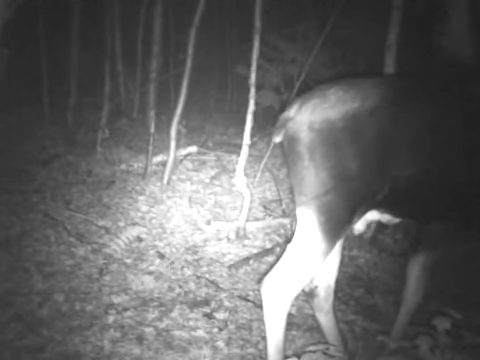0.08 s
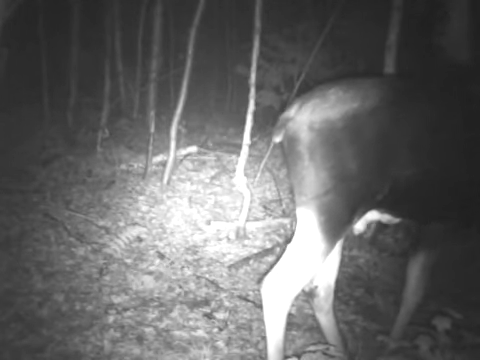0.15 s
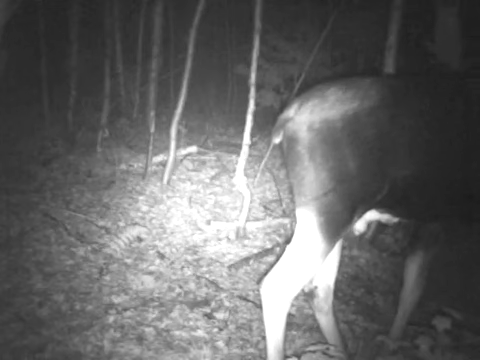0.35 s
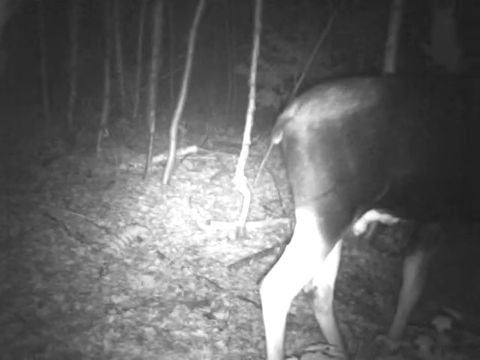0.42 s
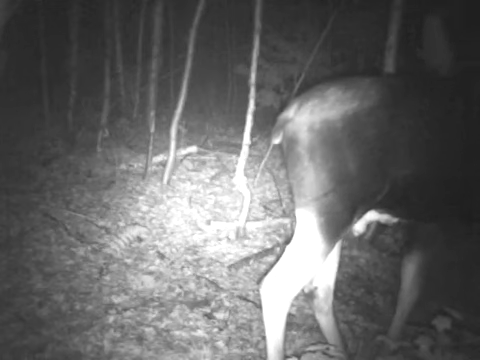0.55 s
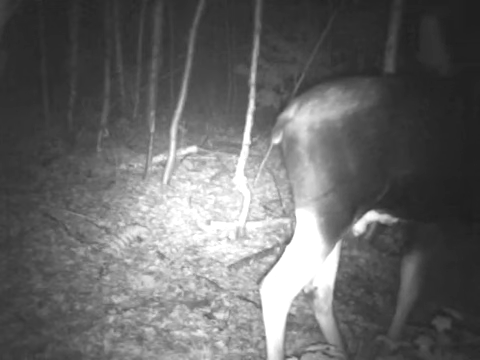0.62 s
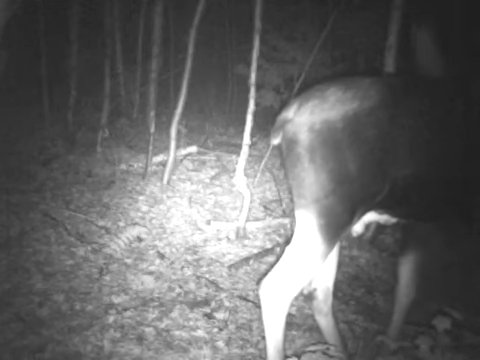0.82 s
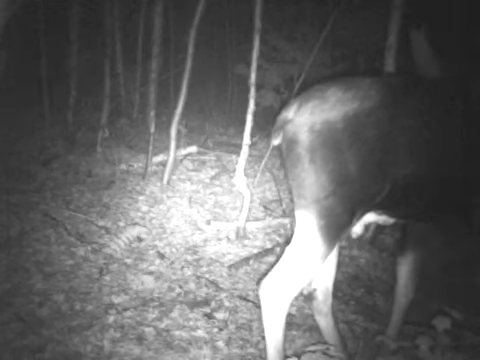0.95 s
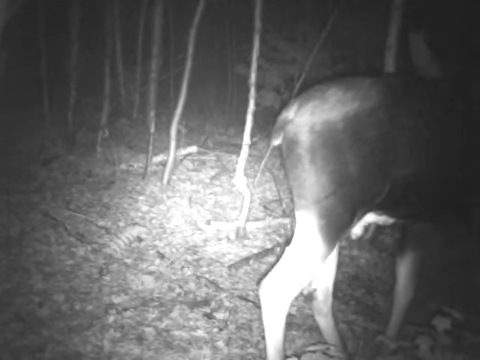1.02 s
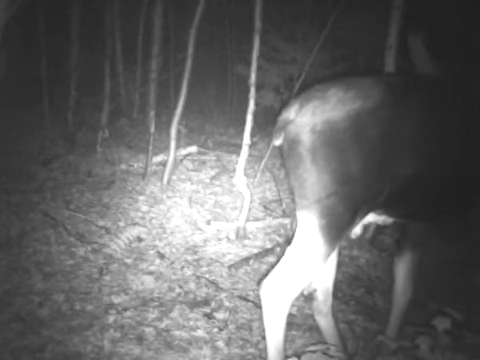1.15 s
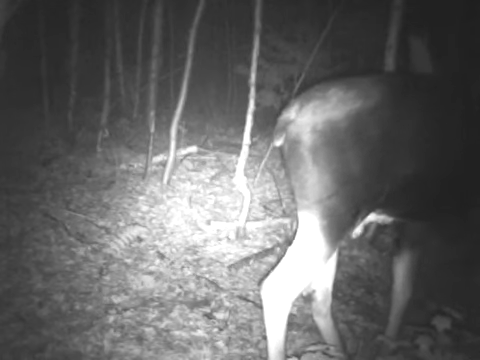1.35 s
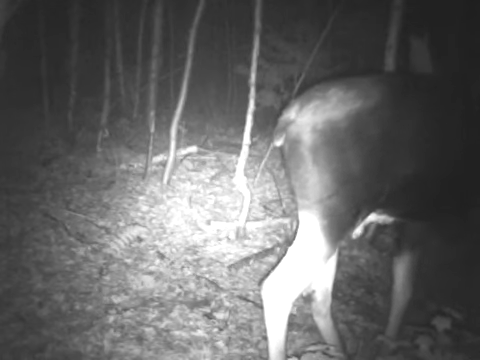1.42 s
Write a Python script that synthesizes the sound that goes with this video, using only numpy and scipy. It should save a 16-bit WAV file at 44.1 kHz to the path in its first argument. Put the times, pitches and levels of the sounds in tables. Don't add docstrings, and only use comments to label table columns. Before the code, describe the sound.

A cow moose gives one short nasal moan that bursts into a loud bellow and breaks wetly.

```python
import sys
import numpy as np
from scipy import signal
from scipy.fft import rfft, irfft
from scipy.io import wavfile
from scipy.ndimage import uniform_filter1d

SR = 44100
rng = np.random.default_rng(int(sys.argv[2]) if len(sys.argv) > 2 else 0)


def log_audio(samples):
    frames = np.atleast_2d(samples).T
    limited = np.clip(frames, -1, 1)
    pcm = np.round(limited * 32767).astype(np.int16)
    wavfile.write(sys.argv[1], SR, pcm)


def voltage_ratio(level):
    return 10 ** (np.asarray(level, float) / 20)


N = 66150


def evened(x):
    return x / np.sqrt(np.mean(x ** 2) + 1e-20)


def read(points, hz):
    f, value = np.transpose(points)
    return np.interp(np.log(hz + 1), np.log(f + 1), value)


def coloured(points):
    gain = voltage_ratio(read(points, np.fft.rfftfreq(N, 1 / SR)))
    return evened(irfft(rfft(rng.standard_normal(N)) * gain, N))


def slow(rate_hz):
    return evened(signal.lfilter(*signal.butter(2, rate_hz, fs=SR), rng.standard_normal(N)))


def swells(rows):
    t = np.arange(N) / SR
    return sum(voltage_ratio(db) * np.exp(-((t - centre_s) / half_s) ** 2) for centre_s, half_s, db in rows)


def ring(rows):
    out, t = np.zeros(N), np.arange(6000) / SR
    for start_s, hz, db, t60_s in rows:
        onset = 1 - np.exp(-t / (0.067 * t60_s))
        tone = np.sin(2 * np.pi * hz * t * (1 - 1.6 * t))
        out[round(start_s * SR):][:len(t)] += 2 * voltage_ratio(db - 60 * t / t60_s) * onset * tone
    return out


def peak(f, hz, width_hz):
    return 1j * f * width_hz / (hz ** 2 - f ** 2 + 1j * f * width_hz)


# time_s, low_hz, low_db, main_hz, chest_db, nose_db
THROAT_SHUT = [(.035, 764, 13, 1073, 58, -22.5), (.06, 983, 9, 1400, 9, 7), (.09, 661, 9, 1440, -1, -4),
               (.135, 833, 5.5, 1200, -7.5, -1.5), (.2, 918, -8.5, 1214, -10, -12),
               (.26, 932, -2, 1236, -15, -5.5), (.31, 590, -3, 1254, -9.5, -7.5),
               (.345, 662, -6, 989.3, -18.5, -10.5), (0.372, 647, 0, 985, -13, 1.5)]
THROAT_OPEN = [(.381, 870, -21, 1236, -22.5, -27), (0.395, 820, -4.5, 1172, -15.5, -48),
               (0.421, 820, -8.5, 1184, -22.5, -9.5), (0.435, 1000, -6, 1310, -16, -32),
               (0.469, 1095, -10, 1296, -25, -47), (0.489, 1010, -7.5, 1260, -24.5, -55),
               (.51, 990, -3, 1289, -27, -2), (0.536, 881, -4, 1300, -1, -23)]
# centre_hz, width_hz, level_db
NOSE = [(1754, 93, -3.5), (2262, 98, -16.5), (2500, 250, -18.5)]
LOW_WIDTH_HZ, MAIN_WIDTH_HZ, TOP_HZ = 105, 96.3, 2600
CHEST_HZ, CHEST_WIDTH_HZ = 337, 220
SINUS_HZ, SINUS_WIDTH_HZ, SINUS_DB = 589, 129, -6
RING_SHARE = .6


def throat(f, t):
    shape = np.transpose(THROAT_SHUT + THROAT_OPEN)
    low_hz, low_db, main_hz, chest_db, nose_db = (np.interp(t, shape[0], c) for c in shape[1:])
    chest = voltage_ratio(chest_db) * peak(f, CHEST_HZ, CHEST_WIDTH_HZ) ** 2
    sinus = voltage_ratio(SINUS_DB + .5 * chest_db) * peak(f, SINUS_HZ, SINUS_WIDTH_HZ)
    low = voltage_ratio(low_db) * peak(f, low_hz, LOW_WIDTH_HZ)
    main = peak(f, main_hz, MAIN_WIDTH_HZ)
    nose = sum((-1) ** i * voltage_ratio(db) * peak(f, hz, width_hz) for i, (hz, width_hz, db) in enumerate(NOSE))
    total = chest + sinus - low + main * peak(f, main_hz, 5 * MAIN_WIDTH_HZ) - voltage_ratio(nose_db) * nose
    gain = abs(total) * np.exp(1j * RING_SHARE * np.angle(main)) / (1 + (f / TOP_HZ) ** 14)
    return gain / np.sqrt(.5 * (abs(gain) ** 2).sum(0))


# time_s, pitch_hz, level_db
MOAN = [
    (.022, 393.2, -55),
    (.038, 384, -33.5),
    (.06, 317, -42.5),
    (.092, 259, -42),
    (.112, 282.3, -38),
    (.136, 298.8, -33),
    (.206, 309.6, -27),
    (.3, 299.8, -26),
    (0.379, 283.6, -24.5),
]
# time_s, pitch_hz, level_db
BELLOW = [
    (.381, 286, -18),
    (.392, 281, -13),
    (.431, 267, -16.5),
    (.449, 261.5, -10),
    (.486, 249.5, -9.5),
    (.494, 244, -14),
    (.506, 236, -20),
    (.53, 232, -25),
    (.544, 226, -38),
]
# time_s, share (0-1)
ROUGH = [(0, .08), (.12, .04), (.25, .04), (.285, .08), (.32, .04), (.375, .03), (.383, .08), (.392, .05),
         (.495, .05), (.512, .4), (.545, .6)]
WOBBLE = .0025
CREAK_DB, CREAK_RATE_HZ, FLUTTER = 4, 67, .9


def voice():
    t = np.arange(N) / SR
    time_s, pitch_hz, level_db = np.transpose(MOAN + BELLOW)
    rough = np.clip(np.interp(t, *np.transpose(ROUGH)), 0, 1)
    pitch_hz = np.interp(t, time_s, pitch_hz)
    shaken_hz = pitch_hz * (1 + WOBBLE * slow(40) + 0.29 * rough ** 2 * slow(220))
    phase = 2 * np.pi * np.cumsum(shaken_hz) / SR
    k = np.arange(1, 13)[:, None]
    chance = np.array([slow(120) + 1j * slow(120) for _ in k])
    flutter = 1 + rough * (.5 + k / 6) * chance * FLUTTER
    sound = (throat(k * pitch_hz, t) * flutter * np.exp(1j * k * phase)).real.sum(0)
    sound = sound / np.sqrt(1 + 1.3 * rough ** 2)
    level_db = np.interp(t, time_s, level_db, -120, -120) + CREAK_DB * rough * slow(CREAK_RATE_HZ)
    return uniform_filter1d(voltage_ratio(level_db), size=90) * sound


# start_s, pitch_hz, level_db, t60_s
SLAPS = [
    (.3812, 1180, -10, .03),
    (.5085, 1180, -9.5, .016),
    (.5132, 1320, -10, .035),
    (.5195, 900, -14, .025),
    (.5237, 1310, -10.5, .032),
    (.524, 2700, -38, .06),
]


def slaps():
    return ring(SLAPS)


# start_s, pitch_hz, level_db, t60_s
GULPS = [
    (.528, 336, -23, 0.066),
    (.505, 466, -25.5, 0.061),
    (.553, 880, -23.5, .025),
    (0.56, 417, -33.5, 0.013),
    (0.561, 134, -34.5, 0.062),
    (.573, 490, -20.5, 0.039),
    (0.581, 1090, -35, .025),
]
GULP_ROUGH = .3


def gulps():
    return ring(GULPS) * (1 + GULP_ROUGH * slow(210))


# hz, density_db
GURGLE = [(200, -39), (330, 9), (480, 9.5), (650, -20), (1000, 4), (1500, 1.5), (2000, -37.5)]
GURGLE_S, GURGLE_DB, GURGLE_T60_S, GURGLE_LUMP_DB = .54, -32, 0.42, 4


def gurgle():
    t = np.arange(N) / SR - GURGLE_S
    level_db = GURGLE_DB - 60 * abs(t) / GURGLE_T60_S + GURGLE_LUMP_DB * slow(50)
    return coloured(GURGLE) * np.clip(t / 0.012, 0, 1) * voltage_ratio(level_db)


# centre_s, half_s, level_db
PUFFS = [
    (0, 0.016, -50),
    (0.276, 0.034, -50.5),
    (.375, 0.036, -42.5),
    (0.532, 0.011, -50.5),
    (.57, 0.029, -50),
    (.61, 0.019, -49),
]
# hz, density_db
AIR = [(150, -12), (450, 11), (1500, 6), (3500, 5), (5500, -0.5), (8000, -23)]


def nostrils():
    return coloured(AIR) * swells(PUFFS)


# centre_s, half_s, level_db
HEAVES = [
    (.365, .02, -48.5),
    (.42, 0.032, -49.5),
    (.5, 0.073, -50.5),
    (.62, 0.036, -65),
]


def flank():
    return coloured([(40, 1), (100, 0.5), (150, -7), (220, -33.5)]) * swells(HEAVES)


# start_s, pitch_hz, level_db
TICKS = [
    (.245, 4570, -39.5),
    (0.779, 2670, -49),
    (1.236, 3000, -42.5),
]


def twigs():
    return ring([(*row, .008) for row in TICKS])


# hz, t60_s
FOREST = [(150, 0.59), (400, 1.4), (800, 1.66), (1200, 1.175), (2200, .6), (5000, 0.64)]
FOREST_DB, NEAR_DB, NEAR_T60_S = -30, -26, .2


def forest(x):
    taps = np.zeros(SR)
    at = np.arange(400, SR - 20, 20) + rng.integers(0, 20, (SR - 401) // 20)
    taps[at] = rng.choice([-1., 1.], len(at))
    hz, t, z = signal.stft(taps, SR, nperseg=256)
    far = signal.istft(z * voltage_ratio(-60 * t / read(FOREST, hz)[:, None]), SR, nperseg=256)[1]
    near = taps * voltage_ratio(-60 * np.arange(SR) / SR / NEAR_T60_S)
    far = voltage_ratio(FOREST_DB) * far[:SR] / np.linalg.norm(far)
    near = voltage_ratio(NEAR_DB) * near / np.linalg.norm(near)
    return signal.fftconvolve(x, far + near)[:N]


# hz, density_db
HISS = [(40, -21), (90, -4), (170, -7), (420, 4.5), (1000, 0), (3000, -6), (10500, -9), (13000, -20.5),
        (15800, -52)]
HISS_DB = -52


def hiss():
    return voltage_ratio(HISS_DB + .5 * slow(6.6)) * coloured(HISS)


def scene():
    call = voice() + slaps() + gulps() + gurgle() + nostrils() + flank() + twigs()
    return (call + forest(call) + hiss())[None]


def band_limit(x):
    return signal.sosfilt(signal.butter(12, 15750, fs=SR, output="sos"), x)


GRIT_DB, GRIT_HOLD_S, RUMBLE_DB = -30, 0.00067, -41
OFFSET = -.0363


def record(dry):
    swing = np.sqrt(abs(uniform_filter1d(dry ** 2, size=round(GRIT_HOLD_S * SR), axis=1)))
    slow_swing = uniform_filter1d(swing, size=2000, axis=1)
    grit = voltage_ratio(GRIT_DB) * coloured([(20, 14.5), (3000, 10), (9000, 7.5), (12000, 4), (13500, -35), (15000, -20)])
    rumble = voltage_ratio(RUMBLE_DB) * coloured([(20, 14), (110, -21), (250, -25), (500, -25)])
    mix = -dry + swing * grit + slow_swing * rumble + OFFSET
    return band_limit(mix)


dry = scene()
out = record(dry)
log_audio(out)
```